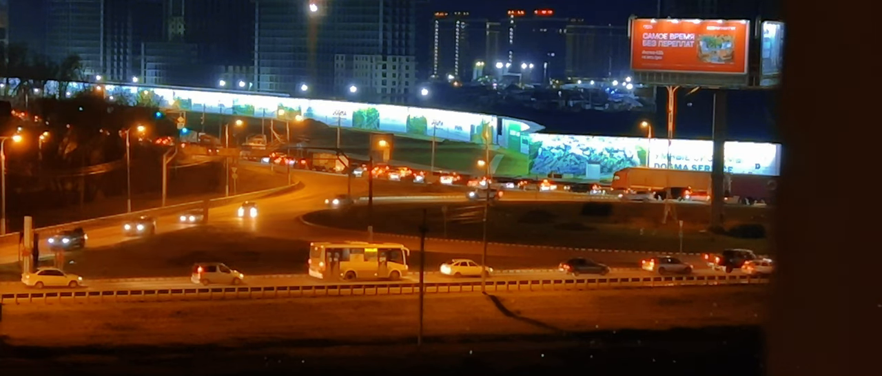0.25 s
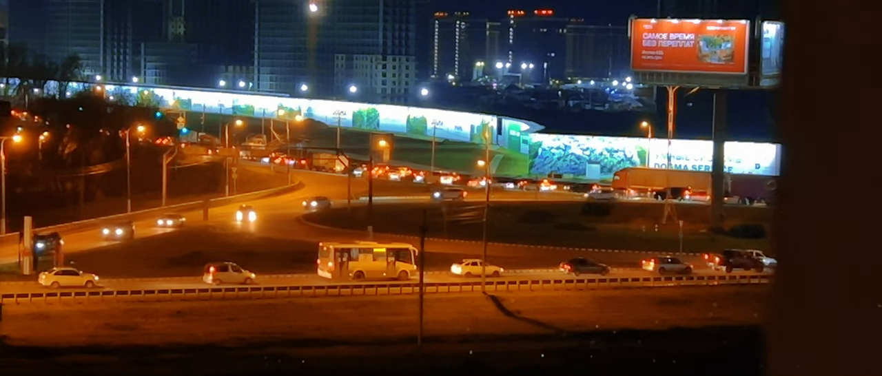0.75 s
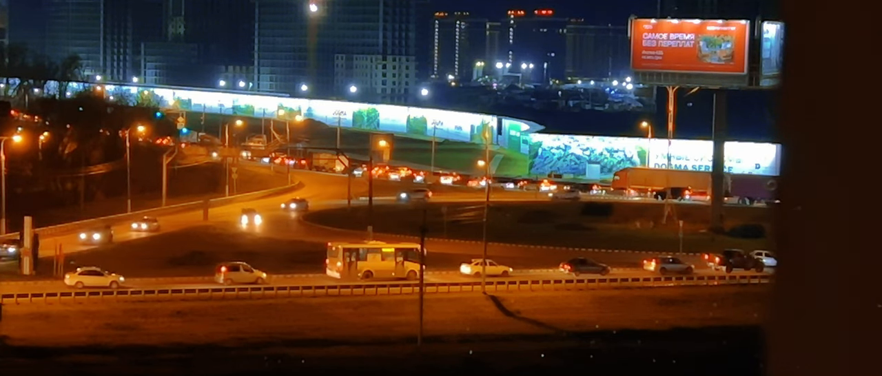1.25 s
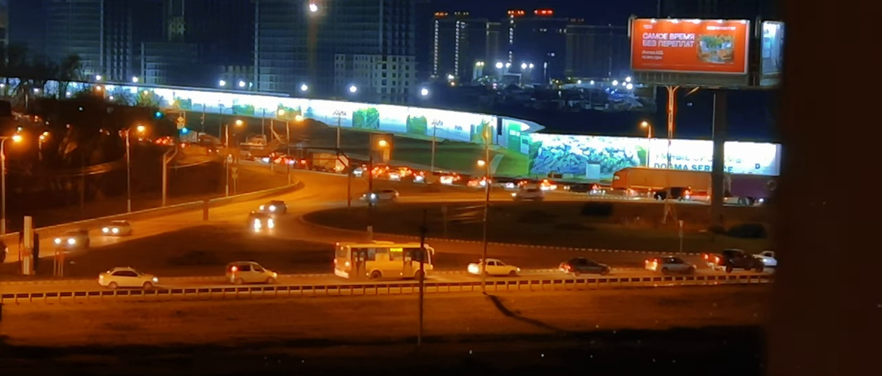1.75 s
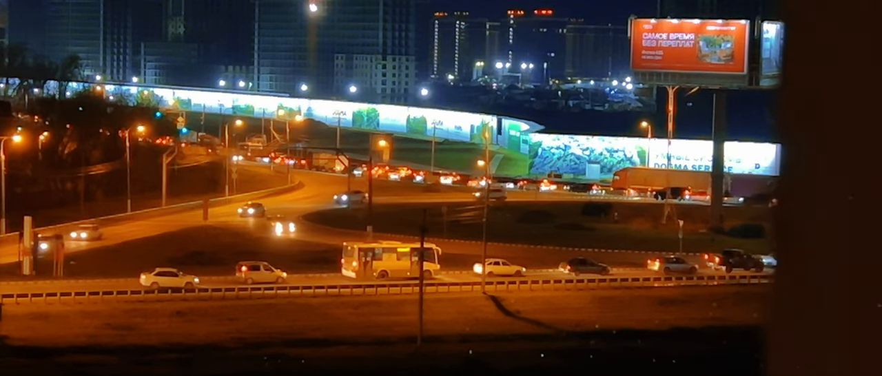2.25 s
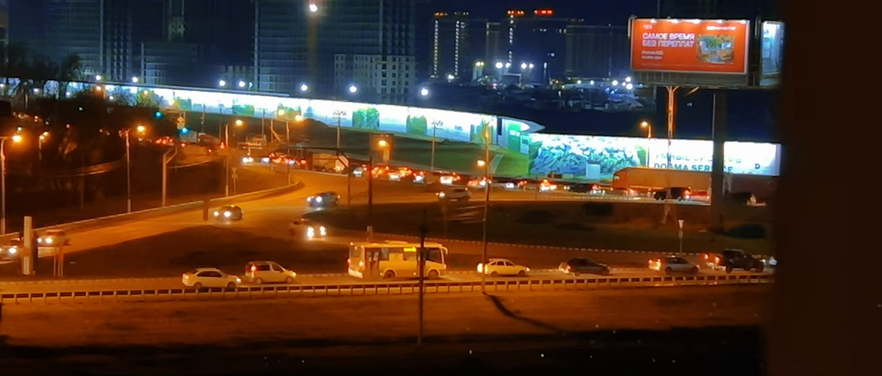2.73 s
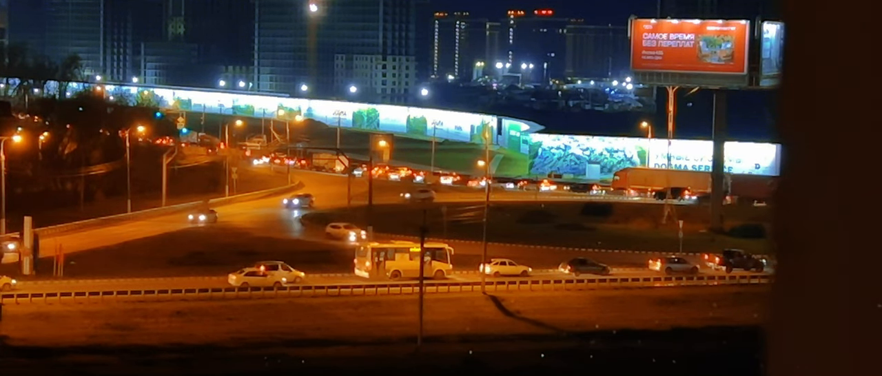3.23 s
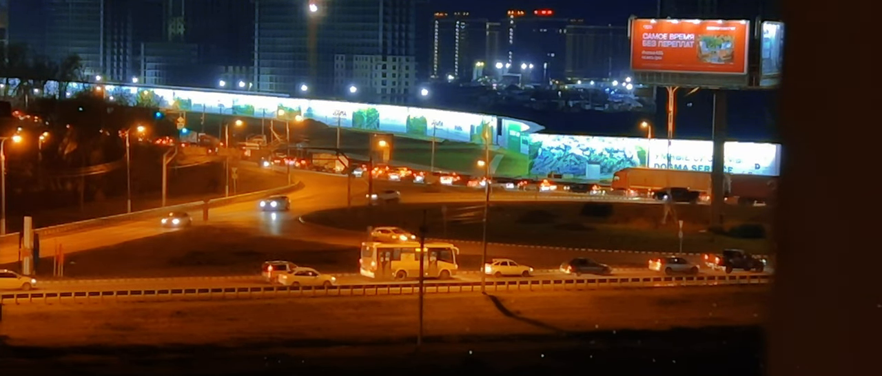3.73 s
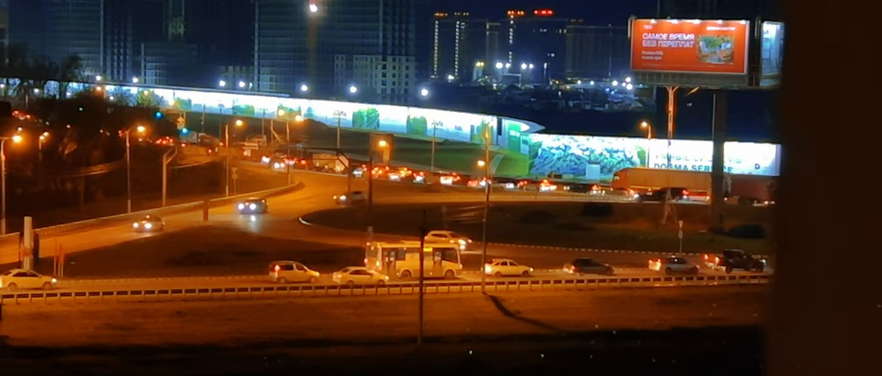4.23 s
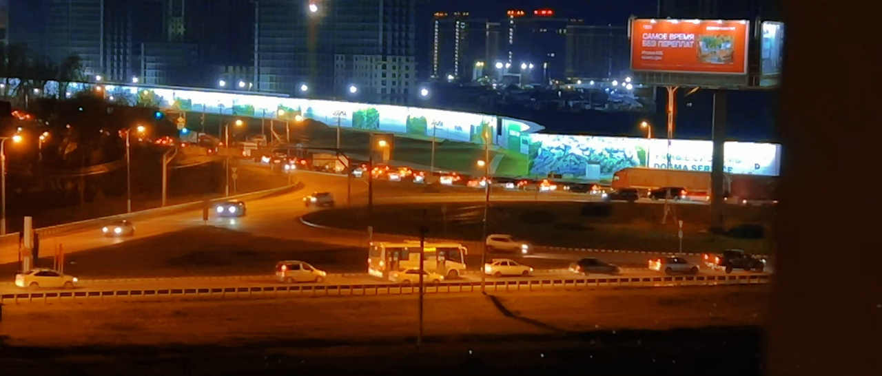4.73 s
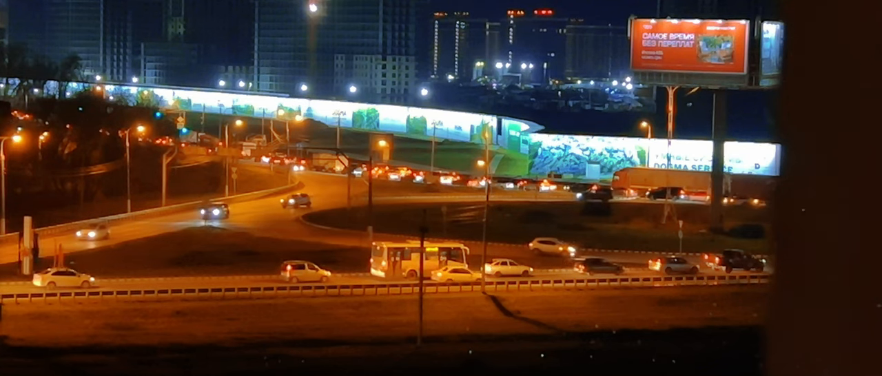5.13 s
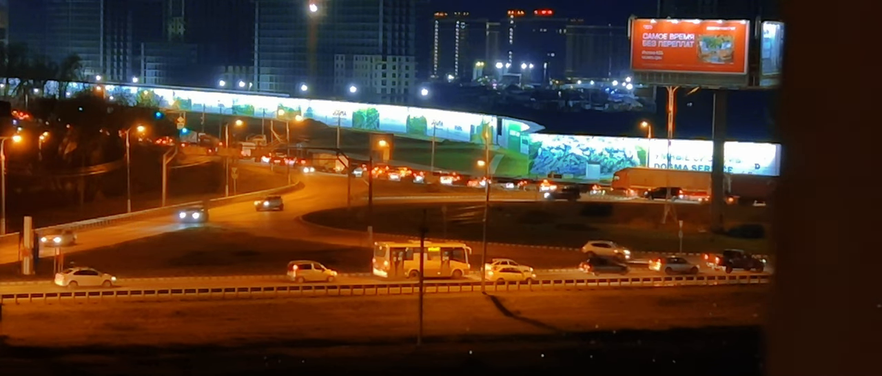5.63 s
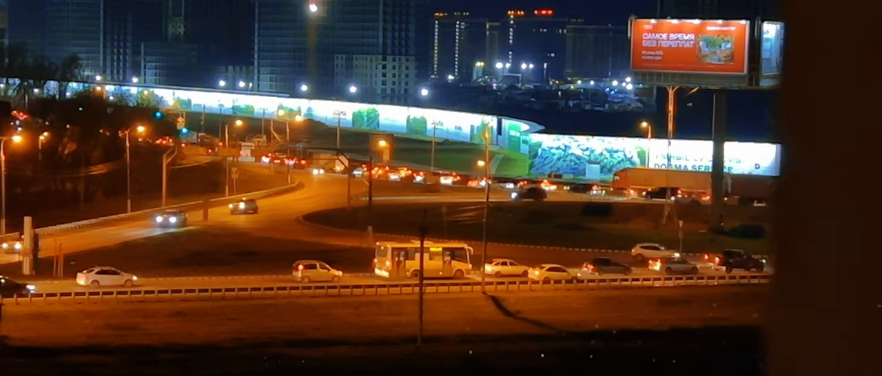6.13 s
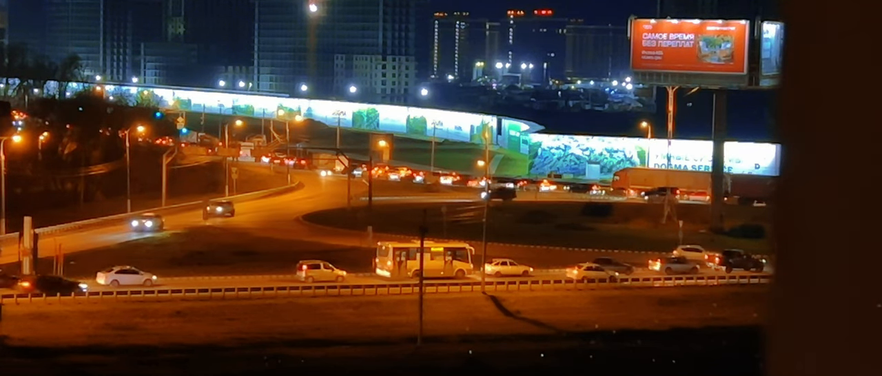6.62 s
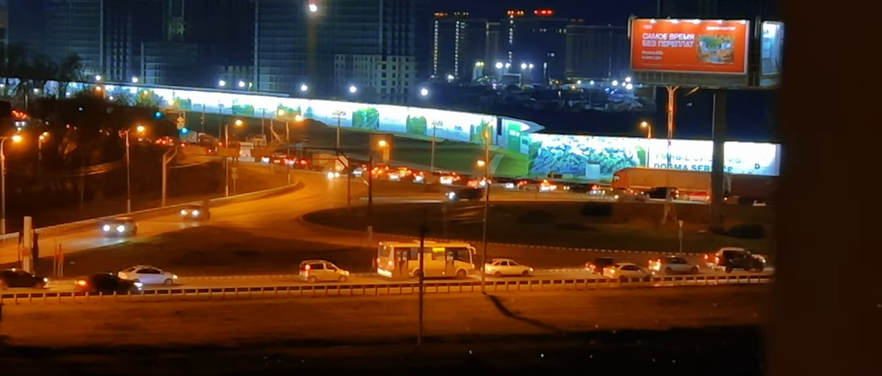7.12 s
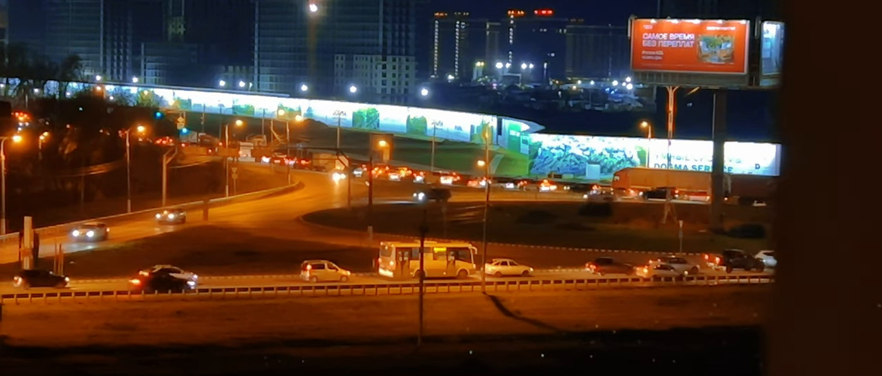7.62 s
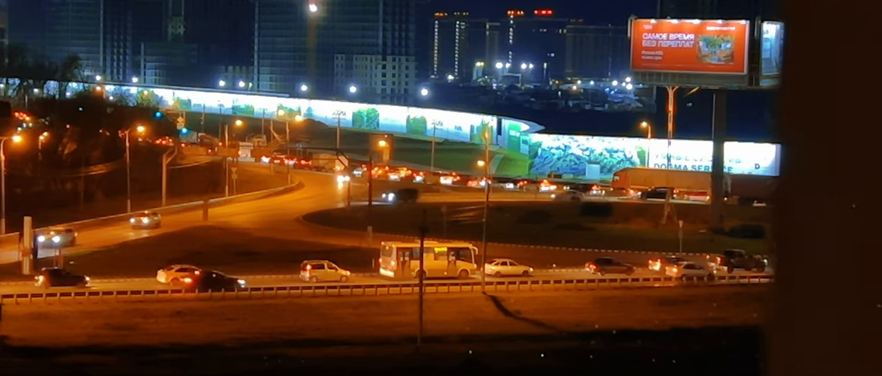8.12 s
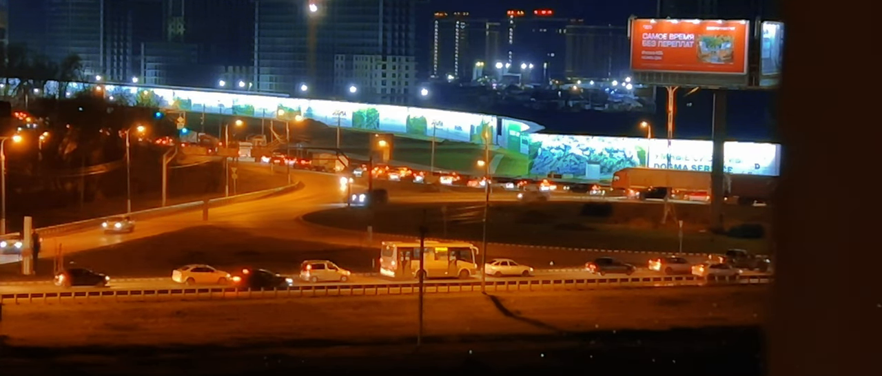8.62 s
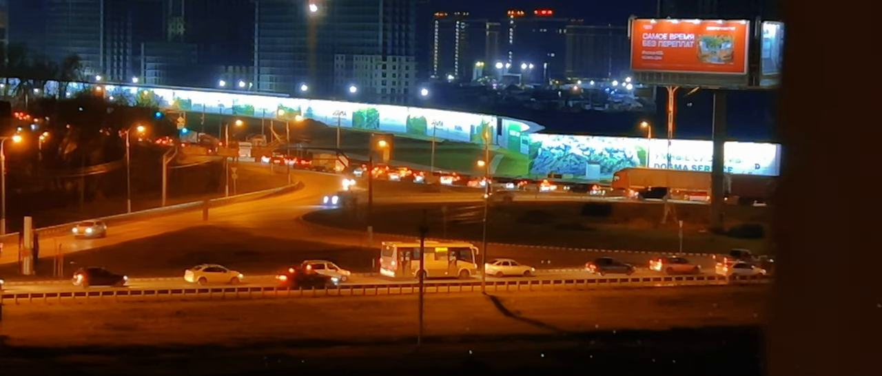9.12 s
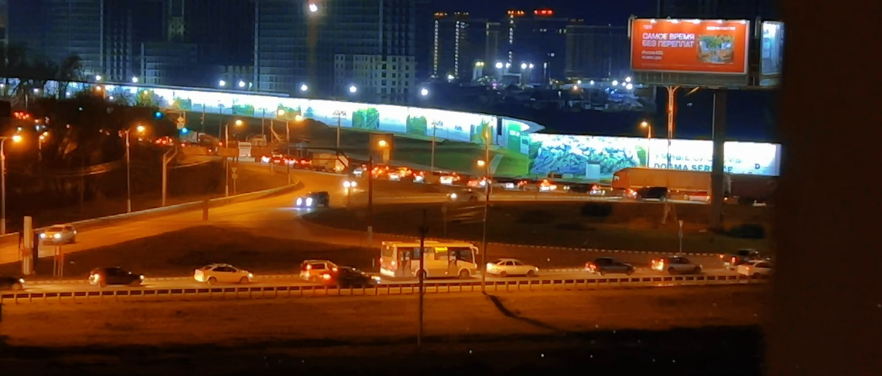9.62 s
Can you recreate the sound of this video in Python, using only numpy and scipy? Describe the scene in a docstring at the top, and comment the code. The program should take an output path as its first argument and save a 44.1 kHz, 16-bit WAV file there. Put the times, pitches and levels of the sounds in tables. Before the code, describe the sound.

A deep, continuous wash of slow city traffic, a bus humming and slowing, a lorry's brief low swell, soft scuffs and ticks close by.

```python
"""A high window over a wide road full of slow traffic: exhausts rumble and tyres roar without a pause.
The mass is shaped noise that swells as cars roll past, under a steady treble hiss; a bus, a lorry and
other low tones are stacks of harmonics. Far-off brakes squeak as short gliding tones.
Close to the microphone something rustles, scuffs, ticks and clicks faintly: short-lived filtered noise."""
import sys
import numpy as np
from scipy import signal
from scipy.fft import rfft, irfft, next_fast_len
from scipy.io import wavfile
from scipy.ndimage import uniform_filter1d, map_coordinates

SR = 44100
rng = np.random.default_rng(int(sys.argv[2]) if len(sys.argv) > 2 else 0)


def materialize(psi):
    """Save the field psi as 16-bit PCM at rate SR to the path in sys.argv[1].

    A 1-D psi becomes a single channel; in a 2-D psi each row is a channel.
    """
    bounded = np.clip(np.atleast_2d(psi).T, -1, 1)
    quanta = np.round(bounded * 32767).astype(np.int16)
    wavfile.write(sys.argv[1], SR, quanta)


N = 434812

# colours of the low tones: multiple of the base rate, relative level/dB
RASPY = [(1, 3.5), (2, -5), (3, -5.5), (4, -11.5)]
HUMMING = [(1, 3.5), (2, -12)]
BUZZY = [(2, 3), (3, -2), (4, -1.5), (5, -7)]
DEEP = [(1, -1), (2, -12.5), (3, -18), (4, -17.5)]


def amp(db):
    """Decibels to gain."""
    return 10 ** (np.asarray(db) / 20)


def unit(x):
    """Scaled to rms 1."""
    return x / np.sqrt(np.mean(x ** 2) + 1e-20)


def along(points, hz):
    """Points of (f/Hz, value) read on a log frequency axis."""
    f, v = np.transpose(points)
    return np.interp(np.log(hz + 1), np.log(f + 1), v)


def curves(rows):
    """One value per sample for each column after the time."""
    s, *cols = np.transpose(rows)
    return [np.interp(np.arange(N) / SR, s, c) for c in cols]


def wobble(rate):
    """A smooth random curve, rate knots a second."""
    knots = rng.standard_normal(int(N * rate / SR) + 4)
    return map_coordinates(knots, [np.arange(N) * rate / SR])


def filtered(x, response):
    """x passed through a complex response of frequency."""
    m = next_fast_len(N + SR // 2)
    return irfft(rfft(x, m) * response(np.fft.rfftfreq(m, 1 / SR)), m)[..., :N]


def rush(spectrum, patchy_db):
    """Diffuse noise of rms 1 with drifting patches, partly shared by the two microphone ports."""
    # likeness of the two ports: f/Hz, correlation (-1 to 1)
    alike = [(60, 0.99), (230, 0.96), (350, 0.94), (500, 0.48), (700, 0.45), (1050, 0.26), (1400, 0.88),
             (2200, 1), (3400, 0.95), (7600, 1), (8400, .55), (10000, -.7), (12000, -0.44), (12700, .85)]
    z = signal.stft(rng.standard_normal((2, N)), nperseg=1024)[2]
    field = uniform_filter1d(rng.standard_normal(z.shape[1:]), size=6, axis=0)  # across frequency
    field = uniform_filter1d(field, size=24, axis=1)  # across time
    pair = signal.istft(z * amp(patchy_db * unit(field)), nperseg=1024)[1][:, :N]

    def mid_side(hz):
        turn = np.arccos(np.clip(along(alike, hz), -1, 1)) / 2
        return amp(along(spectrum, hz)) * np.array([np.cos(turn), np.sin(turn)])

    mid, side = filtered(pair, mid_side)
    return unit(np.array([mid + side, mid - side]))


def presence(rows, fade):
    """A vehicle emerges from the mass before its first row and sinks back after its last."""
    t = np.arange(N) / SR
    return np.clip(1 + np.minimum(t - rows[0][0], rows[-1][0] - t) / fade, 0, 1)


def rotation(hz, unsteady):
    """Phase of an engine that never runs quite evenly."""
    turns = np.cumsum(hz * (1 + unsteady * wobble(12))) / SR
    return 2 * np.pi * (turns + rng.random())


def exhaust(firing_hz, note, flutter_db):
    """Harmonics of the firing rate; reflections off the road make each flutter by itself."""
    phase = rotation(firing_hz, unsteady=0.005)
    out = np.zeros(N)
    for k, level in note:
        start = 2 * np.pi * rng.random()
        out += amp(level + flutter_db * wobble(9)) * np.sin(round(k) * phase + start)
    return np.sqrt(2) * out


def traffic():
    """Massed engines blur into rumble, hum and drone; roar and hiss swell as each car rolls past."""
    # colours of the noise: f/Hz, relative level per Hz/dB
    rumble_colour = [(20, -25.5), (30, -18), (40, -11.5), (53, 1), (72, -3), (85, -5), (98, -10),
                     (125, -15), (190, -37.5), (1000, -120)]
    hum_colour = [(10, -78), (70, -4.5), (100, 4), (120, 11), (160, 16), (176, 9.5), (195, 6.5),
                  (260, -45.5), (1000, -120)]
    drone_colour = [(50, -70), (150, -26), (195, -2), (225, 2.5), (250, 2.5), (290, 0), (370, -5),
                    (500, -5.5), (800, -12), (2000, -65), (8000, -120)]
    roar_colour = [(200, -22), (450, -7.5), (650, -1.5), (930, 1), (1200, -3), (1500, -8), (1780, -10.5),
                   (1950, -20), (2150, -19), (3000, -34.5), (5000, -79), (12000, -120)]
    car_hiss_colour = [(900, -9.5), (1900, 2.5), (2150, 4), (2600, -2), (3200, -4.5), (4000, -14),
                       (5000, -23), (6400, -32), (8000, -50), (10000, -75)]
    # cars rolling past in the free lanes: t/s when nearest, tyre roar level/dB, tyre hiss level/dB
    passes = [(.25, -45, -47), (1.4, -39.5, -53), (2.7, -37.5, -47.5), (3.9, -47, -53.5),
              (5.85, -39, -49.5), (6.65, -35.5, -48.5), (7.35, -34.5, -49), (8.55, -39.5, -56),
              (9.15, -43, -56.5), (9.75, -35.5, -48.5)]
    pass_s = 0.4  # distance over speed: a car is 3 dB down this long before and after it is nearest
    rumble_db, hum_db, drone_db, steady_roar_db = -31.5, -38, -36, -37
    drift_db = .5  # slow rise and fall of the massed engines

    t = np.arange(N) / SR
    mass = lambda db: amp(db + drift_db * wobble(1.5))
    rumble = mass(rumble_db) * rush(rumble_colour, patchy_db=0.7)
    hum = mass(hum_db) * rush(hum_colour, patchy_db=0.46)
    drone = mass(drone_db) * rush(drone_colour, patchy_db=0.5)

    nearest, roar_db, hiss_db = np.transpose(passes)
    nearness = 1 / (1 + ((t - nearest[:, None]) / pass_s) ** 2)  # power falls with distance squared
    roar_power = amp(steady_roar_db) ** 2 + amp(roar_db) ** 2 @ nearness
    roar = np.sqrt(roar_power) * rush(roar_colour, patchy_db=0.86)
    car_hiss = np.sqrt(amp(hiss_db) ** 2 @ nearness) * rush(car_hiss_colour, patchy_db=1.0)
    return rumble + hum + drone + roar + car_hiss


def treble_hiss():
    """Steady treble hiss: shaped noise whose level hardly moves; above 8 kHz only a faint noise floor."""
    # f/Hz, relative level per Hz/dB
    hiss_colour = [(900, -10.5), (1900, 1.5), (2150, 3), (2600, -2), (3100, -3.5), (4000, -11), (4800, -16),
                   (6400, -21), (7300, -30.5), (8500, -34), (10000, -38), (12000, -39.5), (12600, -43),
                   (14000, -44)]
    # t/s, level/dB
    hiss_level = [(0, -53.5), (1.7, -50.3), (3.5, -51), (5.3, -49.8), (7.6, -50.3), (9.86, -52)]
    return amp(curves(hiss_level)[0]) * rush(hiss_colour, patchy_db=1.1)


def low_tone(row, flutter_db):
    """A stack of harmonics swells and sinks back, its pitch steady or gliding."""
    s, rise, fall, base_hz, glide, db, note = row
    t = np.arange(N) / SR - s
    ramp = np.clip(1 + np.minimum(t / rise, -t / fall), 0, 1)
    swell = ramp ** 0.66  # exponent below 1 is rounded, above 1 pointed
    return swell * amp(db) * exhaust(base_hz + glide * t, note, flutter_db)


def low_tones():
    """Engine notes, brief throbs and one long steady hum: stacks of harmonics, most of them gliding."""
    # t/s when loudest, rise/s, fall/s, base f/Hz then, glide/(Hz per s), level/dB, colour
    tone_rows = [(.6, 0.79, 1.1, 79.3, 5.5, -35, RASPY), (.3, .25, 0.65, 138.8, 7.5, -39.5, HUMMING),
                 (.6, .25, .25, 115.5, -0.5, -38, HUMMING), (.95, .15, .2, 79.5, 5, -33, DEEP),
                 (1.27, .1, .12, 154, 0, -37.5, HUMMING), (1.33, .15, .17, 103.5, 0, -38, HUMMING),
                 (1.33, .2, .2, 53, -4, -30, DEEP), (1.4, .9, .5, 167.3, 9, -45.5, HUMMING),
                 (2.4, 3, 2.2, 72.2, 1, -39, DEEP), (2.5, 0.25, .3, 58.06, -6, -35, DEEP),
                 (2.6, .6, .5, 237.2, 5.5, -50, HUMMING), (2.8, 0.86, 0.72, 220.5, 9, -45.5, HUMMING),
                 (3.2, .2, .35, 55, 0, -35, DEEP), (3.72, .15, .2, 68, 0, -33, DEEP),
                 (3.6, 0.79, .7, 177.3, 10, -49, HUMMING), (3.92, 0.23, .18, 139.9, 9, -37.5, HUMMING),
                 (4.22, 0.15, .13, 127.5, 5, -36, HUMMING), (4.18, .2, 0.18, 54.84, 5, -29.5, DEEP),
                 (4.38, .18, 0.33, 95.4, -4.5, -42.5, BUZZY), (4.57, .13, .12, 143.4, 0, -37, HUMMING),
                 (4.65, .4, .45, 65.5, 7, -35, DEEP), (4.93, .1, .12, 139, -3.5, -37, HUMMING),
                 (5.33, .15, 0.17, 144, 3.5, -33.5, HUMMING), (5.45, 0.41, .35, 56.5, -5, -32, DEEP),
                 (7.15, 1.3, .35, 148.3, 1.5, -42, HUMMING), (7.3, .7, 2.2, 55.78, 1.24, -29.5, DEEP),
                 (8.42, 0.22, .35, 66.2, -4, -24, DEEP), (9.45, 0.54, .25, 132.2, 3, -38, HUMMING),
                 (9.58, .22, 0.2, 55.65, -7, -24.5, DEEP)]
    return sum(low_tone(row, flutter_db=2.0) for row in tone_rows)


def rustle(life, level_db):
    """A surface slides with a soft swish that uneven little slips roughen; every stroke has its own pitch."""
    # strokes: t/s when strongest, rise and fall/s, level/dB before level_db, factor on the frequencies
    strokes = [(1.21, .07, -63, 1), (1.4, 0.1, -64, 1), (1.6, 0.12, -63, 1), (1.78, 0.035, -62, 1.04),
               (2.01, .13, -60, 1), (2.33, 0.28, -63, 1), (3.27, .055, -65, 1.2), (3.27, .1, -64, 0.95),
               (3.44, .09, -57.5, .99), (4.22, .13, -69.5, 1.1), (5.1, 0.4, -69, .95),
               (6.17, 0.09, -60.5, .9), (6.17, .04, -66, 1.13), (6.68, .07, -66, 1.22),
               (6.69, .13, -58, .79), (6.9, 0.08, -62.5, 1.08), (6.91, .05, -70, 1.3),
               (7.35, 0.15, -61, 1.04), (7.35, .4, -63.5, .87), (8.45, 0.2, -66, 0.96),
               (8.79, .06, -63, .99)]
    # f/Hz, relative level per Hz/dB
    rustle_colour = [(500, -59), (2500, -19.5), (4500, -8), (5700, -0.5), (6250, 9), (6900, 3),
                     (7400, -8.5), (8200, -13.5), (9200, -31), (14000, -38)]
    slips_per_s, uneven, scatter_db = 110, .45, 3  # uneven: log spread of the gaps
    slide_share = .38  # share of the power that is smooth sliding
    stroke_shape = 1.4  # 1 is a pointed stroke, 2 a rounded one

    t = np.arange(N) / SR
    gaps = rng.lognormal(0, uneven, int(2 * slips_per_s * N / SR)) / slips_per_s
    strengths = amp(scatter_db * rng.standard_normal(len(gaps)))
    slips = np.bincount((np.cumsum(gaps) * SR).astype(int), strengths, N)[:N]
    puffs = unit(signal.fftconvolve(slips, np.exp(-np.arange(SR // 20) / SR / life))[:N])
    grains = np.sqrt(slide_share + (1 - slide_share) * puffs ** 2) * rng.standard_normal(N)
    out = np.zeros(N)
    for s, fade, db, factor in strokes:
        rubbing = amp(db) * np.exp(-np.abs((t - s) / fade) ** stroke_shape)
        out += rubbing * unit(filtered(grains, lambda hz: amp(along(rustle_colour, hz / factor))))
    return amp(level_db) * out


def ticks(life, width_hz, level_db):
    """The strongest slips: dry, fast-decaying noise ticks, each around its own pitch."""
    # t/s, level/dB before level_db and the decay, centre f/Hz
    tick_rows = [(1.7716, -44, 6600), (1.9475, -45, 5700), (1.9574, -46, 7600), (1.9585, -45, 6200),
                 (1.9854, -43, 6600), (1.997, -44, 6600), (2.0527, -51, 6400), (2.1203, -47, 6350),
                 (2.128, -47, 6400), (2.2917, -46, 6200), (3.1769, -46, 6300), (3.2223, -47, 6200),
                 (3.2477, -49, 7200), (3.2909, -48, 7200), (3.4124, -46, 6100), (3.4598, -46, 6200),
                 (3.4797, -47, 6200), (3.7419, -51, 7600), (6.144, -45.5, 7000), (6.1735, -43, 5500),
                 (6.7975, -51, 7900), (6.876, -48, 6727), (7.204, -44, 6500), (7.205, -48, 8000),
                 (7.2333, -51, 7200), (7.3431, -48, 7400), (7.3644, -43, 6467), (8.295, -48, 6700),
                 (8.3986, -45, 6150), (8.7682, -50, 6450), (8.7842, -51, 5900)]
    out, t = np.zeros(N + SR), np.arange(SR // 16) / SR
    hz = np.fft.rfftfreq(len(t), 1 / SR)
    envelope = np.exp(-t / life) * (1 - np.exp(-t / 0.00094))  # onset of about a millisecond
    for s, db, centre_hz in tick_rows:
        bell = 1 / (1 + ((hz - centre_hz) / width_hz) ** 4)
        band = irfft(rfft(rng.standard_normal(len(t))) * bell, len(t))
        out[round(s * SR):][:len(t)] += amp(db + level_db) * unit(band) * envelope
    return out[:N]


def bus():
    """Six cylinders fire three times a turn in a firm hum; the body booms at higher crankshaft orders."""
    # it gathers speed, then slows and labours: t/s, crankshaft f/Hz, firing tone level/dB, body boom level/dB
    bus_rows = [(2.85, 24.39, -46.5, -41), (4.0, 26.02, -43, -40.5), (4.7, 26.7, -41.5, -42),
                (5.3, 26.5, -31.5, -40.5), (5.9, 25.92, -35, -40.5), (6.3, 25.55, -33, -44.5),
                (6.85, 25.13, -32, -40), (7.3, 24.81, -35.5, -40), (7.8, 24.28, -30.3, -39.5),
                (8.3, 23.85, -30, -40), (8.9, 23.15, -25.5, -38), (9.5, 22.3, -31, -36),
                (10.1, 21.6, -32, -37.5)]
    overtones_db = -8  # order 4, against the boom
    shaft_hz, firing_db, boom_db = curves(bus_rows)
    turn = rotation(shaft_hz, unsteady=.003)

    def order(count, db, flutter_db):
        return np.sqrt(2) * amp(db + flutter_db * wobble(7)) * np.sin(count * turn)

    firing = order(count=3, db=firing_db, flutter_db=0.8)
    boom = order(count=5, db=boom_db, flutter_db=2.5)
    overtones = order(count=4, db=boom_db + overtones_db, flutter_db=1.8)
    overtones += order(count=8, db=boom_db + overtones_db - 4, flutter_db=2.0)
    return presence(bus_rows, fade=0.17) * (firing + boom + overtones)


def scuffs():
    """Brief, duller rubs: noise that swells and fades with the pressure."""
    # t/s when strongest, half length/s, level/dB
    scuff_rows = [(3.851, 0.012, -53), (4.197, 0.032, -50), (6.68, 0.1, -58.5)]
    # f/Hz, relative level per Hz/dB
    scuff_colour = [(300, -54), (1500, -25), (2600, -1), (3300, 2), (4200, -9.5), (5200, -13), (6000, -15),
                    (8000, -27.5), (10000, -53)]
    t = np.arange(N) / SR
    pressure = sum(amp(db) * np.exp(-((t - s) / half) ** 2) for s, half, db in scuff_rows)
    return pressure * unit(filtered(rng.standard_normal(N), lambda hz: amp(along(scuff_colour, hz))))


def brakes():
    """A brake disc sings briefly on one slightly gliding mode."""
    # faint squeaks: t/s, length/s, start f/Hz, end f/Hz, peak level/dB
    squeaks = [(4.25, .19, 5655, 5605, -61), (6.63, .14, 3320, 3300, -54), (8.82, .1, 6490, 6640, -66)]
    t, out = np.arange(N) / SR, np.zeros(N)
    for s, length, start_hz, end_hz, db in squeaks:
        u = np.clip((t - s) / length, 0, 1)
        hz = (start_hz + (end_hz - start_hz) * u) * (1 + .004 * wobble(200))  # slightly rough pitch
        out += amp(db) * np.sin(np.pi * u) * np.sin(2 * np.pi * np.cumsum(hz) / SR)
    return out


def lorry():
    """One deep exhaust note rises with the revs, briefly louder near 73 Hz, then falls."""
    # t/s, firing f/Hz, level/dB
    lorry_rows = [(6.1, 63.22, -35), (6.55, 64.33, -30), (6.75, 68.35, -28.5), (6.92, 72.9, -23),
                  (7.1, 77.33, -30.5), (7.35, 81.4, -32), (7.7, 85.95, -35.5), (8.35, 79, -36)]
    # exhaust note: multiple of the firing rate, relative level/dB
    deep_note = [(1, -0.5), (2, -19.5), (3, -23), (4, -21.5)]
    firing_hz, db = curves(lorry_rows)
    return presence(lorry_rows, fade=0.33) * amp(db) * exhaust(firing_hz, deep_note, flutter_db=0.5)


def clicks():
    """Tiny, sharp snaps beside the microphone: decaying noise in a band of the top treble."""
    # t/s, level/dB before the band filter, life/s
    click_rows = [(7.5797, -48.5, .0007), (8.742, -71, .012)]
    centre_hz, width_hz = 12800, 2000
    t = np.arange(N) / SR
    snaps = sum(amp(db) * (t >= s) * np.exp(-np.abs(t - s) / life) for s, db, life in click_rows)
    band = lambda hz: 1 / (1 + ((hz - centre_hz) / width_hz) ** 4)
    return filtered(snaps * rng.standard_normal(N), band)


def scene():
    """The road below, a steady hiss and the faint rustle nearby."""
    rustle_top_hz = 8500
    road = traffic() + low_tones() + bus() + brakes() + lorry()
    near = rustle(life=0.002, level_db=-4.5) + ticks(life=0.0041, width_hz=750, level_db=-7.0) + scuffs()
    softened = filtered(near, lambda hz: 1 / (1 + (hz / rustle_top_hz) ** 24))
    return road + treble_hiss() + softened + clicks()


def record(dry):
    """The two ports differ in colour and phase; 3 ms fades at both ends keep the edges free of clicks."""
    # left against right: f/Hz, level difference/dB
    balance = [(70, 0.5), (150, -1), (240, -1), (400, -3.5), (580, -0.5), (850, 1), (1150, 5), (1500, 2),
               (2000, -0.5), (7000, 0.5)]
    # f/Hz, phase by which left leads/rad
    lead = [(60, -.08), (240, -.13), (420, -.5), (580, .7), (800, 1.9), (1000, 1.9), (1250, .2),
            (1500, -.25), (2400, 0), (3500, .4), (5500, 0)]
    top_hz = 14500  # nothing passes above this
    sides = np.array([[.5], [-.5]])  # each port takes half of the difference
    ports = lambda hz: amp(sides * along(balance, hz)) * np.exp(1j * sides * along(lead, hz))
    from_edge = np.minimum(np.arange(N), np.arange(N)[::-1])
    edges = np.clip(from_edge / (.003 * SR), 0, 1)
    return filtered(edges * filtered(dry, ports), lambda hz: hz < top_hz)


dry = scene()
out = record(dry)
materialize(out)
```